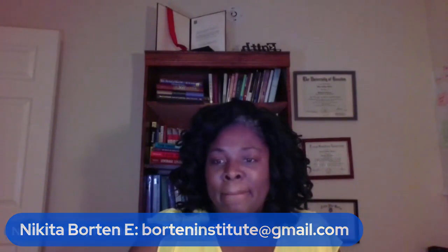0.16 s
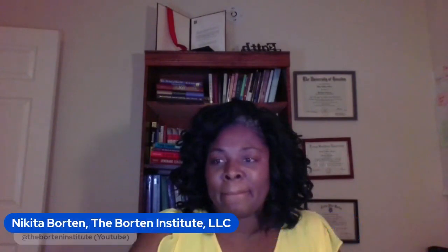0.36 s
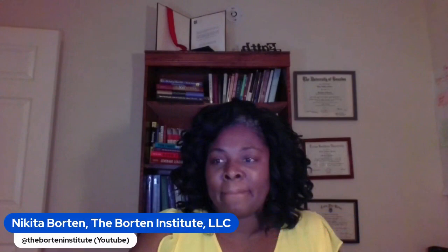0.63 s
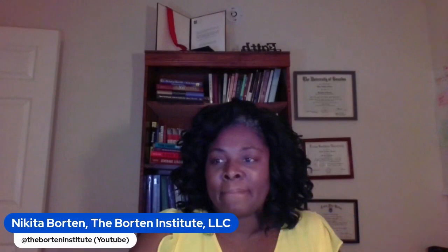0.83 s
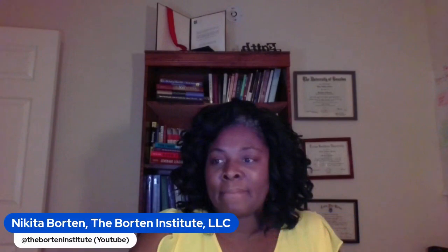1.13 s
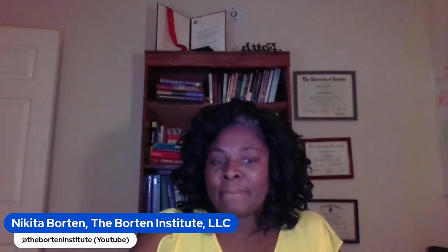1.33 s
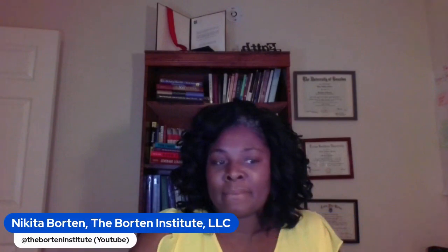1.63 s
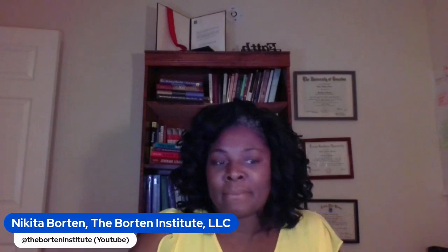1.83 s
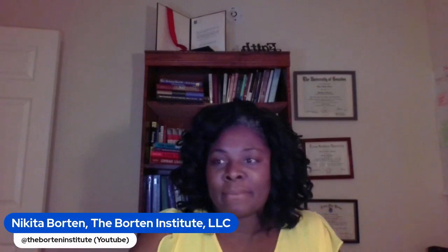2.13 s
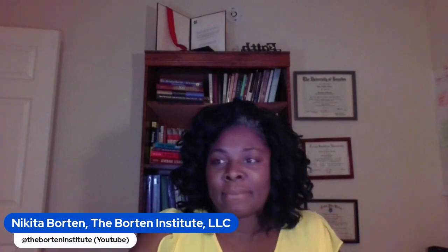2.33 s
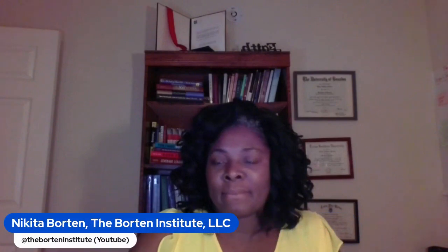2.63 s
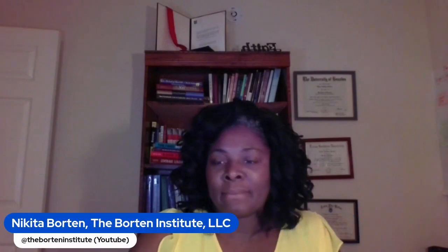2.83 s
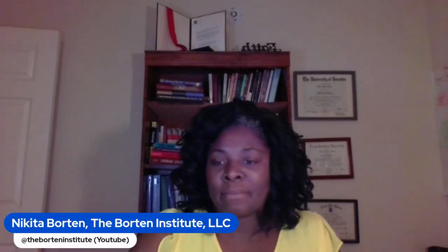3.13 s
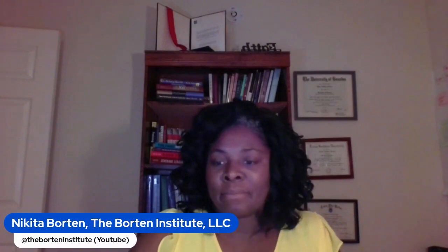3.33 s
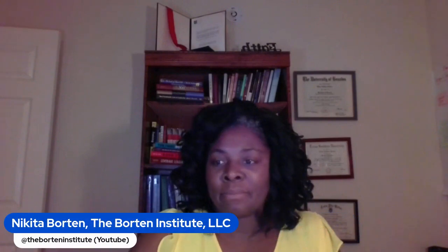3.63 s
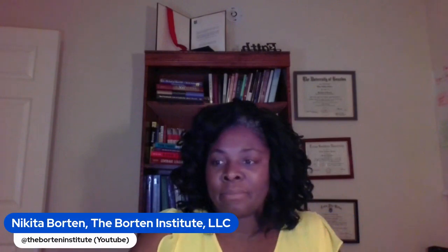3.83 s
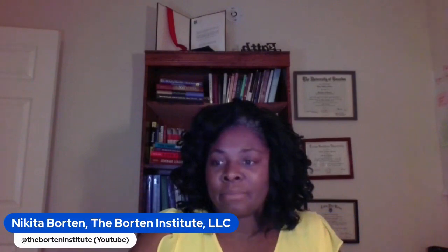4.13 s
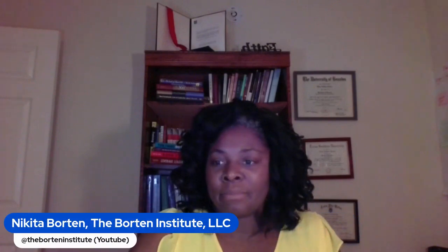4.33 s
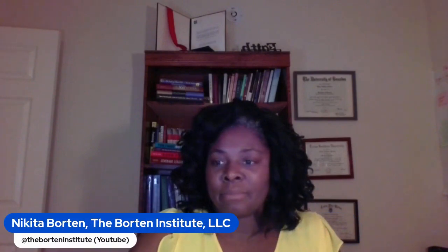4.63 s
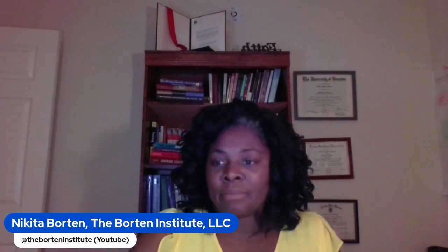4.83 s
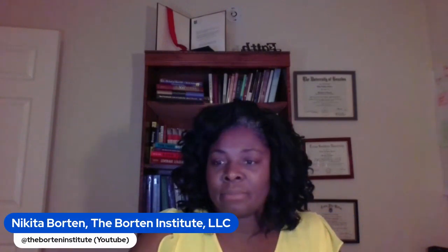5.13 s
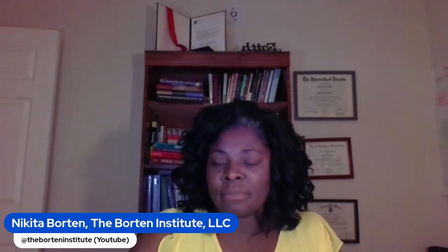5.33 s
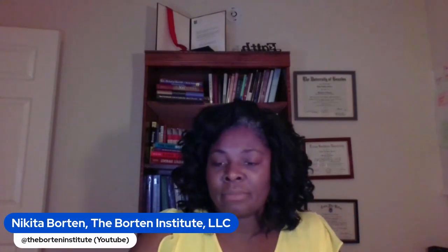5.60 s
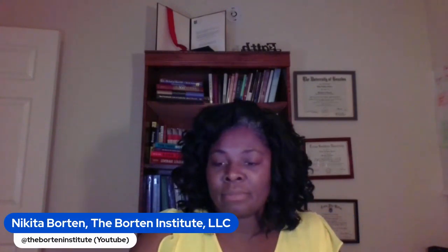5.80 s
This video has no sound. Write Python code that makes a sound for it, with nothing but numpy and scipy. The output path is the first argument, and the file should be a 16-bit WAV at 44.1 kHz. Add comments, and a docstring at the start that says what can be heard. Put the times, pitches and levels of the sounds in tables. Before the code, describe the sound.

Close mono microphone at a desk indoors: an early mouse click, another near the middle and a slower one towards the end, each a snappy down-and-up pair with a short room tail. Muffled low thumps from the desk recur irregularly, with very faint rubbing of the mouse. Underneath, a quiet fan hums and whirs amid low room air and light hiss.

```python
"""Three mouse clicks snap out in a small room: each is a soft press and a louder release. A click is a
chattering noise crack over ringing spring modes, with a shell knock, three echoes and a room tail. The mouse
slides faintly on friction noise, and soft pushes make the desk boom in low decaying modes. Behind them a fan
hums in wavering sines, with filtered noise for its whir, low air and microphone hiss."""
import sys
import numpy as np
from scipy import signal
from scipy.fft import rfft, irfft, next_fast_len
from scipy.io import wavfile
from scipy.ndimage import uniform_filter1d, map_coordinates

SR = 44100
rng = np.random.default_rng(int(sys.argv[2]) if len(sys.argv) > 2 else 0)


def to_wav(sig):
    """Store sig (one row per channel, or 1-D mono) as 16-bit WAV at the path in sys.argv[1].

    Samples outside -1..1 are clipped; the rate is SR.
    """
    pcm = np.clip(np.atleast_2d(sig), -1, 1) * 32767
    pcm = np.round(pcm).astype(np.int16)
    wavfile.write(sys.argv[1], SR, pcm.T)  # frames by channels


N = 262833  # length in samples

# the button going down: (t/s, snap level/dB, room level/dB, shell level/dB, shell tilt/dB per octave)
PRESSES = [(0.3233, -29.5, -40.5, -61, 3), (2.6374, -24.5, -40.5, -57.5, -11.5),
           (4.6418, -25.5, -39.5, -54, 6)]
# the button springing back: (t/s, snap level/dB, room level/dB, shell level/dB, shell tilt/dB per octave)
RELEASES = [(0.4480, -21, -35.5, -60, 5), (2.8005, -20, -35.5, -60, -5), (5.0400, -19.5, -35.5, -57, 6.5)]
# noise colour of the whole mouse on press: (f/Hz, relative level/dB)
PRESS_COLOUR = [(1470, -75), (2500, -47), (3210, -18), (3660, -30), (4050, -22.5), (5610, -34), (6760, -25),
                (7710, -32.5), (8460, -21.5), (9220, -22), (11300, -4.5), (12500, -12), (15200, -16),
                (16000, -11)]
# noise colour of the whole mouse on release: (f/Hz, relative level/dB)
RELEASE_COLOUR = [(1470, -62), (2500, -31.5), (3080, -17.5), (3800, -17.5), (4270, -11.5), (5480, -14),
                  (6650, -30), (8020, -9.5), (9290, -9), (10100, 0.5), (10700, 4.5), (11800, -3),
                  (13000, 1.5), (14900, 3), (16000, -13)]
# a finger barely stirs the button: (t/s, level/dB)
FINGER_TICKS = [(5.862, -54.5)]
PRESS_CHATTER_S, RELEASE_CHATTER_S = .001, .0015  # how long the contact chatters


def mouse():
    """The press builds up briefly; the release is louder, more sudden and has more crack in it."""
    out = clicks(PRESSES, PRESS_COLOUR, chatter=PRESS_CHATTER_S, rise=0.00086, crack_db=-14.5, lead_db=-18)
    out += clicks(RELEASES, RELEASE_COLOUR, chatter=RELEASE_CHATTER_S, rise=0.000234, crack_db=-9.0,
                  lead_db=-15.0)
    for s, db in FINGER_TICKS:
        add(out, s, amp(db) * snap(0.00055, PRESS_COLOUR, crack_db=6, rise=.0002))
    return out


# reflections from screen and wall: (delay t/s, level/dB)
ECHOES = [(.0064, -13), (.0085, -22), (0.0142, -13)]


def clicks(rows, colour, chatter, rise, crack_db, lead_db):
    """Each click: the lever creaks, the switch snaps, the shell knocks, and the room answers."""
    out, size = np.zeros(N), SR // 3
    for s, snap_db, room_db, shell_db, tilt_db in rows:
        creak = snap(0.0025, colour, crack_db, rise=0.0057)
        add(out, s - .0035, amp(snap_db + lead_db) * creak)
        direct = amp(snap_db) * snap(chatter, colour, crack_db, rise)
        add(out, s, direct)
        for delay, db in ECHOES:
            add(out, s + delay, amp(db) * direct)
        # reflections arrive in uneven clumps
        clumps = amp(0.64 * wobble(300)[:size])
        room = reverberate(noise(colour, size), build=0.0047)
        add(out, s, amp(room_db) * clumps * room)
        add(out, s, amp(shell_db) * knock(tilt_db, size))
    return out


# ringing modes of the switch spring: (f/Hz, relative level/dB, t60/s)
SPRING = [(8800, -22, .007), (10400, -11, .005), (11130, 0, .008), (12380, -6, .009), (13000, -14, .008),
          (14740, -4, .008), (15500, -13, .006)]


def snap(chatter, colour, crack_db, rise):
    """The contact chatters as a noise crack and keeps the spring modes ringing as long; then both decay."""
    t = np.arange(SR // 50) / SR
    gate = np.clip(t / rise, 0, 1)
    after_chatter = np.maximum(t - chatter, 0)
    ring = np.zeros(len(t))
    for hz, db, t60 in SPRING:
        # a random walk in phase roughens each mode
        drift = np.cumsum(rng.normal(0, 0.024, len(t))) + rng.uniform(0, 2 * np.pi)
        fade = amp(-60 * after_chatter / t60)
        ring += amp(db + rng.normal(0, 1.8)) * fade * np.sin(2 * np.pi * hz * t + drift)
    crack = amp(crack_db - 60 * after_chatter / 0.0044) * noise(colour, len(t))
    sound = gate * (ring + crack)
    # the energy of rms 1 held for 2 ms
    return sound / np.sqrt(np.sum(sound ** 2) / (SR * .002))


# resonances of the hollow plastic shell: (f/Hz, half width/Hz, relative level/dB)
SHELL = [(744, 145, 8.5), (1270, 180, -2), (1783, 124, -1), (2320, 48, -10.5), (3400, 57, -22),
         (4070, 53, -2.5), (5180, 120, -9.5)]


def knock(tilt_db, size):
    """The shell's damped modes knock and leave a room tail; tilt and random level set each mode's share."""
    t = np.arange(size) / SR
    modes = []
    for hz, width, db in SHELL:
        tilt = tilt_db * np.log2(hz / 1000)
        modes.append((hz, width, db + tilt + rng.normal(0, 0.77)))
    ring = np.zeros(size)
    for hz, width, db in modes:
        fade = np.exp(-2 * np.pi * width * t)
        ring += amp(db) * fade * np.sin(2 * np.pi * (hz * t + rng.random()))
    tail_noise = unit(filtered(rng.standard_normal(size), lambda f: resonance(modes, f)))
    tail = reverberate(tail_noise, build=0.0013)
    attack = np.clip(t / 0.000067, 0, 1)
    early_lift = 1 + 0.69 * np.exp(-t / 0.0048)
    return amp(11) * ring / np.abs(ring).max() * attack + tail * early_lift


# decay of the room: (f/Hz, t60/s)
ROOM = [(700, 0.24), (4000, 0.18), (11000, 0.23), (15000, 0.17)]


def reverberate(x, build):
    """Let a noise build up and die away as the room does, each frequency with its own decay time."""
    hz, t, z = signal.stft(x, SR, nperseg=128)
    decay = amp(-60 * t / along(ROOM, hz)[:, None])
    tail = signal.istft(z * decay, SR, nperseg=128)[1][:len(x)]
    return tail * (1 - np.exp(-np.arange(len(x)) / SR / build))


# strokes of the mouse over the desk: (start t/s, length t/s, level/dB)
SLIDES = [(1.72, 0.71, -70.5), (3.076, 0.58, -71.5), (3.967, 0.4, -74.5), (4.796, 0.24, -71.5),
          (5.738, 0.2, -75)]
# noise colour of the sliding friction: (f/Hz, relative level/dB)
RUB = [(300, -11), (600, -5.5), (900, -4.5), (1300, -13.5), (1700, -26), (3500, -28.5), (7000, -52)]
# resonances that the friction stirs: (f/Hz, half width/Hz, level/dB added to the noise)
RUB_MODES = [(846, 10, 11), (1040, 9.8, 10.5)]
RUB_UNEVEN_DB = 1.8  # rms waver of the friction


def slides():
    """The mouse speeds up and slows down in each stroke; its uneven friction follows the speed."""
    speed = np.zeros(N)
    for s, length, db in SLIDES:
        add(speed, s, amp(db) * arch(length))
    friction = unit(filtered(noise(RUB, N), lambda f: 1 + resonance(RUB_MODES, f)))
    return speed * amp(RUB_UNEVEN_DB * wobble(14)) * friction


# the clear bumps on the desk: (t/s, level/dB, push length t/s)
BUMPS = [(0.195, -49.5, .05), (0.593, -47.5, 0.044), (1.126, -48.5, 0.047), (1.59, -45.5, 0.024),
         (2.115, -53, 0.042), (2.839, -44.5, 0.024), (3.63, -48.5, 0.033), (3.99, -45.5, 0.07),
         (4.304, -42, .042), (4.459, -48.5, 0.069), (4.87, -45, 0.03), (5.549, -47, .038),
         (5.776, -46, 0.027)]
NUDGE_GAP_S, NUDGE_LENGTH_S = .22, 0.031  # approximate spacing; length of each push
NUDGE_DB, NUDGE_SCATTER_DB = -56, 5  # mean level and its random spread


def desk():
    """Clear bumps, and faint nudges spread loosely through the pauses between them."""
    out = np.zeros(N)
    for s, db, length in BUMPS:
        add(out, s - .005, push(db, length))
    for (start, *_), (end, *_) in zip(BUMPS, BUMPS[1:]):
        count = round((end - start) / NUDGE_GAP_S)
        for s in np.linspace(start, end, count + 1)[1:-1]:
            jitter = NUDGE_GAP_S * rng.uniform(-0.28, .3)
            level_db = NUDGE_DB + rng.normal(0, NUDGE_SCATTER_DB)
            add(out, s + jitter, push(level_db, NUDGE_LENGTH_S))
    return out


# low modes of the desk top: (f/Hz, level/dB relative to the push, t60/s)
DESK = [(122.4, 0.5, 0.16), (156.2, -10, 0.015), (239.8, -22, 0.15), (298, -22, 0.055)]
# part of a push spent swelling; relative pitch scatter from push to push
PUSH_RISE_SHARE, DESK_DETUNE = 0.29, 0.042


def push(level_db, length):
    """A soft push swells the desk's low modes, which then ring out."""
    t = np.arange(SR // 3) / SR
    rise = np.sin(np.pi / 2 * np.clip(t / (PUSH_RISE_SHARE * length), 0, 1)) ** 2
    out = np.zeros(len(t))
    for hz, db, t60 in DESK:
        fade = amp(-60 * np.maximum(t - length, 0) / t60)
        phase = 2 * np.pi * (hz * (1 + rng.normal(0, DESK_DETUNE)) * t + rng.random())
        out += amp(level_db + db) * rise * fade * np.sin(phase)
    return out


# tones of the fan, main tone first: (f/Hz, peak level/dB)
FAN = [(678.3, -71), (848, -85), (1036, -86), (1362, -89.5), (2261, -99)]
# brief swells of the main tone: (start t/s, length t/s, lift level/dB)
SWELLS = [(2.996, 0.13, 11.5), (4.486, 0.26, 10), (4.8, .15, 9.5)]


def fan():
    """Sines wavering in pitch and level; the lowest and strongest one swells."""
    swell_db, out = np.zeros(N), np.zeros(N)
    for s, length, db in SWELLS:
        add(swell_db, s, db * arch(length))
    for k, (hz, db) in enumerate(FAN):
        phase = 2 * np.pi * np.cumsum(hz + 5 * wobble(25)) / SR
        waver_db = 2 * wobble(16)
        out += amp(db + waver_db + (k == 0) * swell_db) * np.sin(phase)
    return out


# room rumble: (f/Hz, relative level/dB)
AIR = [(20, -18), (50, -15.5), (80, -4), (130, 2), (190, -12), (300, -18.5), (600, -46)]
# low rush of moving air: (f/Hz, relative level/dB)
MURMUR = [(120, -23.5), (240, 1.5), (400, -4), (560, -4), (750, -3), (950, -25), (1400, -16), (2500, -44)]
# the desk's resonance in the room air: (f/Hz, relative level/dB)
DRONE = [(60, -41), (90, -13), (122, -4.5), (165, -8.5), (230, -31), (600, -99)]
# air through the fan: (f/Hz, relative level/dB)
WHIR = [(450, -13), (750, -3), (1200, -5), (1700, -9.5), (2300, -9), (3000, -11), (6000, -14),
        (9000, -25.5)]
# microphone hiss: (f/Hz, relative level/dB)
HISS = [(3000, -33.5), (7000, -12.5), (7900, -12.5), (8600, -3.5), (10500, -1), (13000, -2), (15700, -2.5),
        (16100, -51)]
MURMUR_DB, MURMUR_RISE_DB_PER_S, MURMUR_SWAY_DB = -74, .5, 1  # start level, steady growth, rms sway


def background():
    """Filtered noises: swaying low air and desk resonance, a patchy murmur and fan whir, steady hiss."""
    air = amp(-64 + 2.85 * wobble(7.6)) * noise(AIR, N)
    murmur_db = MURMUR_DB + MURMUR_RISE_DB_PER_S * np.arange(N) / SR + MURMUR_SWAY_DB * wobble(2.796)
    murmur = amp(murmur_db) * patchy(noise(MURMUR, N), depth_db=4.0)
    drone = amp(-66.5 + 2.7 * wobble(21)) * noise(DRONE, N)
    whir = amp(-77.5) * patchy(noise(WHIR, N), depth_db=3.0)
    hiss = amp(-72.5) * noise(HISS, N)
    return air + murmur + drone + whir + hiss


def patchy(x, depth_db):
    """Narrow bands of a noise come and go on their own."""
    z = signal.stft(x, nperseg=2048)[2]
    field = uniform_filter1d(rng.standard_normal(z.shape), size=4, axis=0)  # smooth over frequency
    field = uniform_filter1d(field, size=6, axis=1)  # smooth over time
    return unit(signal.istft(z * amp(depth_db * unit(field)), nperseg=2048)[1][:len(x)])


def amp(db):
    """Decibels to gain."""
    return 10 ** (np.asarray(db) / 20)


def unit(x):
    """x at rms 1."""
    return x / np.sqrt(np.mean(x ** 2) + 1e-20)


def along(points, hz):
    """(f/Hz, value) points read on a log frequency axis."""
    f, v = np.transpose(points)
    return np.interp(np.log(hz + 1), np.log(f + 1), v)


def filtered(x, response):
    """x times a response of frequency."""
    m = next_fast_len(len(x) + SR // 4)
    return irfft(rfft(x, m) * response(np.fft.rfftfreq(m, 1 / SR)), m)[:len(x)]


def resonance(modes, f):
    """Summed gain of resonant peaks given as (f/Hz, half width/Hz, level/dB)."""
    return sum(amp(db) / (1 + ((f - hz) / width) ** 2) for hz, width, db in modes)


def noise(spectrum, size):
    """Noise of rms 1 with the given spectrum."""
    return unit(filtered(rng.standard_normal(size), lambda hz: amp(along(spectrum, hz))))


def wobble(rate):
    """A smooth random curve of rms 1, rate knots a second."""
    knots = rng.standard_normal(int(N * rate / SR) + 4)
    return unit(map_coordinates(knots, [np.arange(N) * rate / SR]))


def arch(length):
    """A smooth rise from 0 to 1 and back over length seconds."""
    return np.sin(np.linspace(0, np.pi, int(length * SR)))


def add(track, s, sound):
    """Mix a sound into the track at time s."""
    part = track[max(round(s * SR), 0):][:len(sound)]
    part += sound[:len(part)]


def scene():
    """Everything as it reaches the one microphone."""
    return (mouse() + slides() + desk() + fan() + background())[None]


# treble roll-off of the microphone: (f/Hz, level/dB)
MICROPHONE = [(15600, 0), (16000, -17), (16500, -19)]
TOP_HZ = 16500  # band limit


def record(dry):
    """The top treble rolls off, and nothing is kept above the band limit."""
    def response(hz):
        """Microphone gain up to the band limit."""
        return amp(along(MICROPHONE, hz)) * (hz < TOP_HZ)
    return np.array([filtered(x, response) for x in dry])


dry = scene()
out = record(dry)
to_wav(out)
```